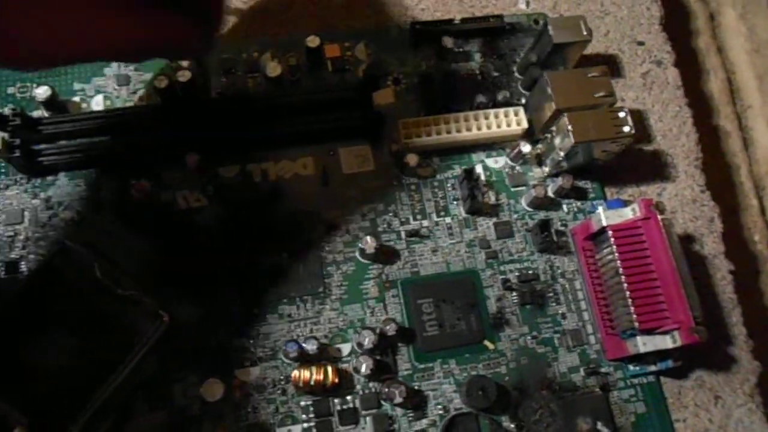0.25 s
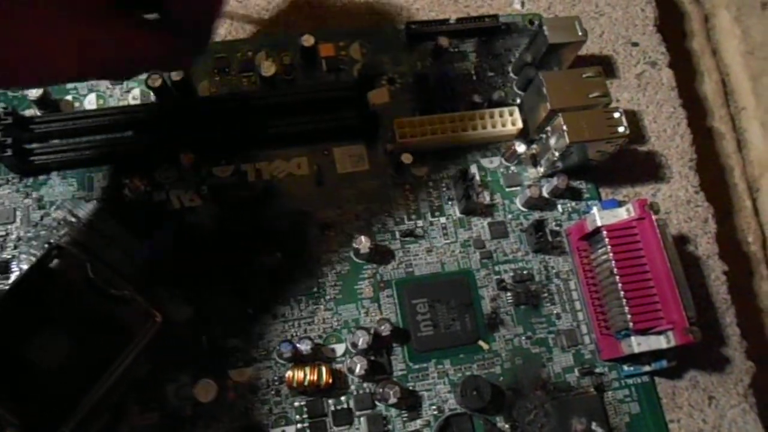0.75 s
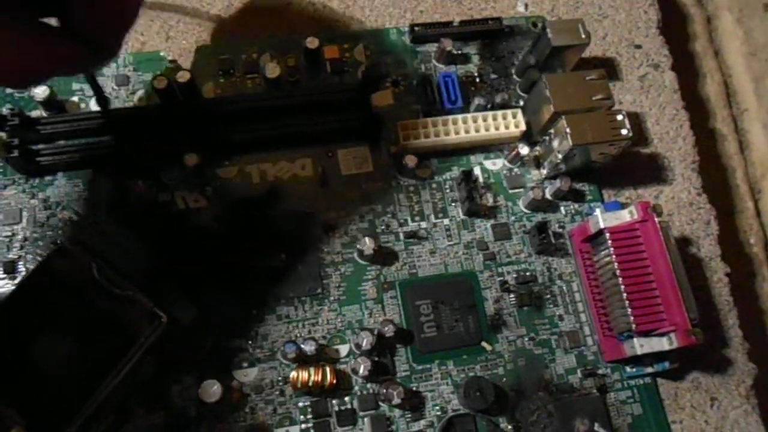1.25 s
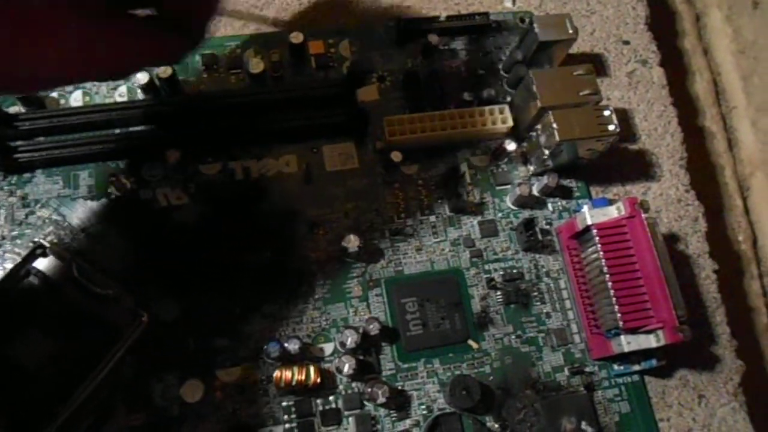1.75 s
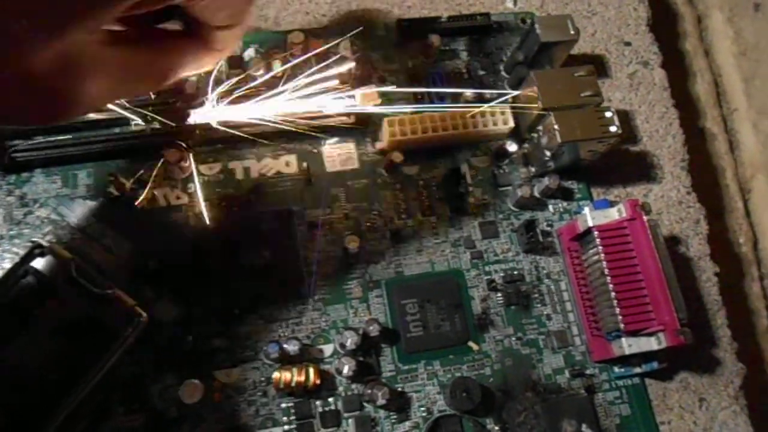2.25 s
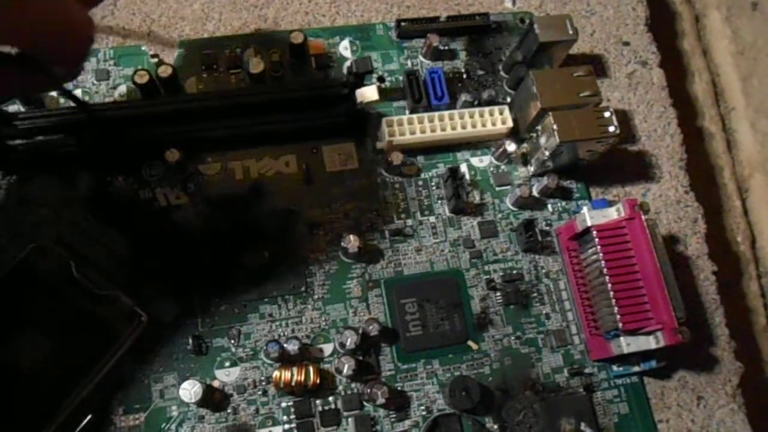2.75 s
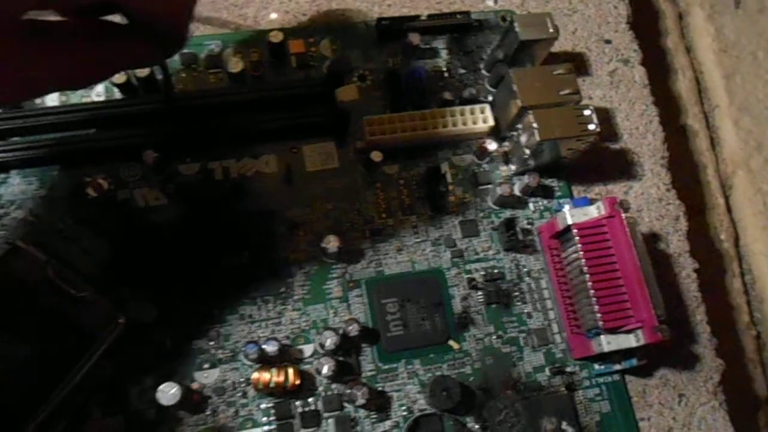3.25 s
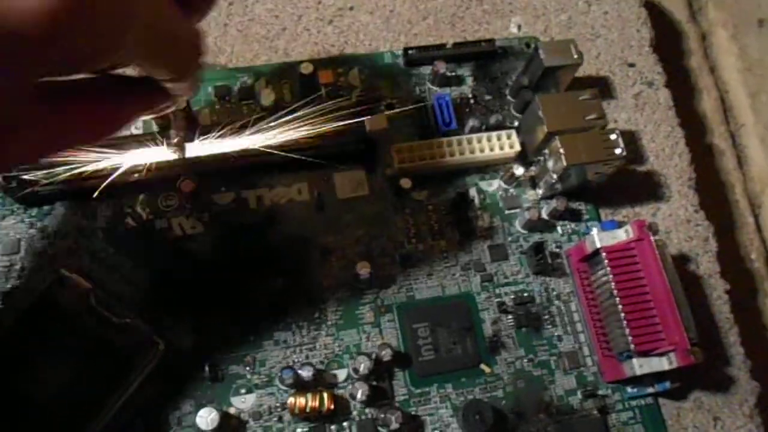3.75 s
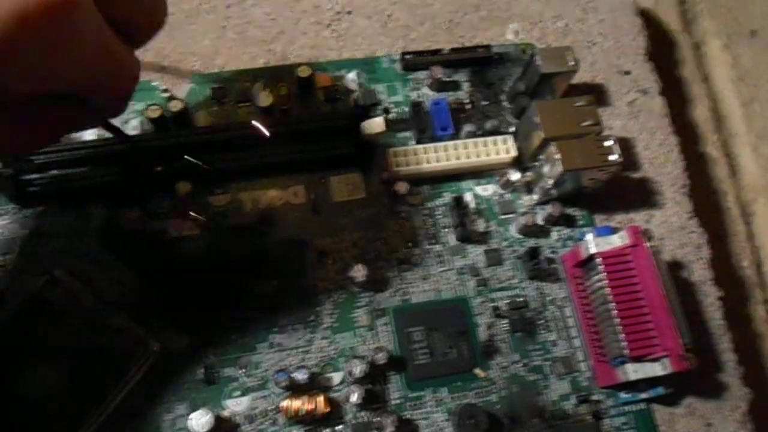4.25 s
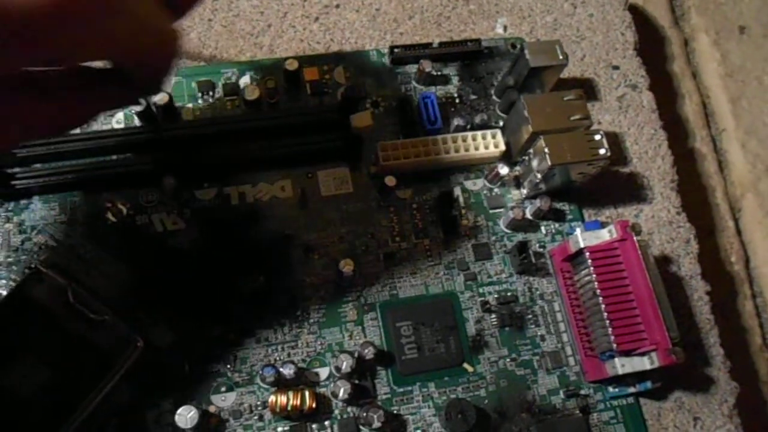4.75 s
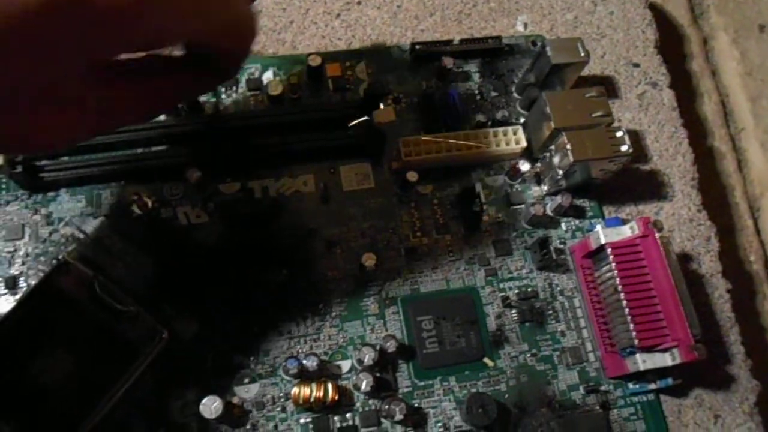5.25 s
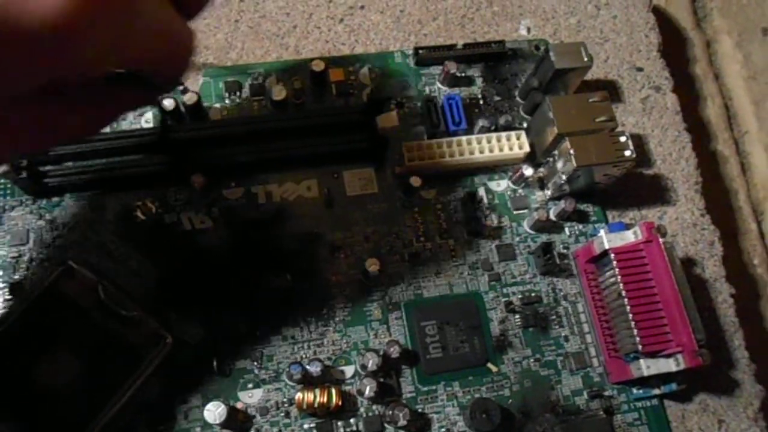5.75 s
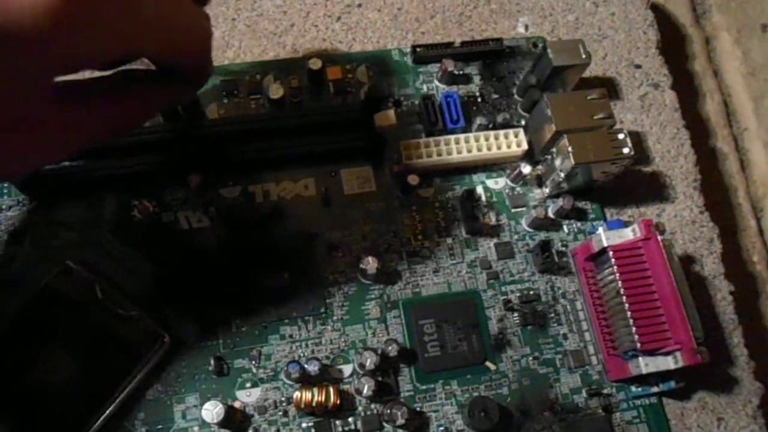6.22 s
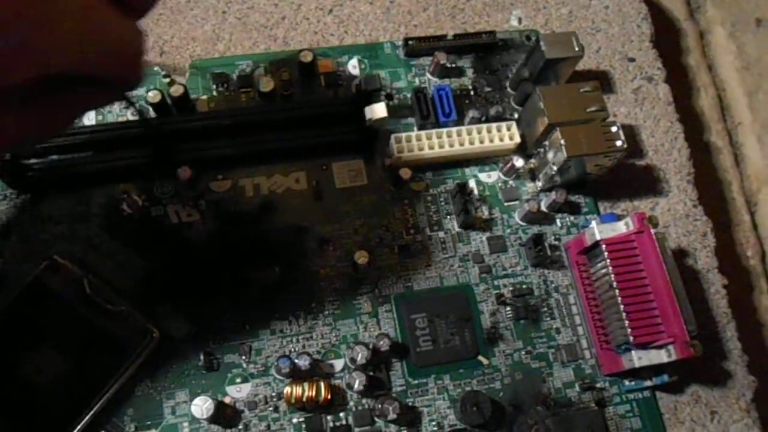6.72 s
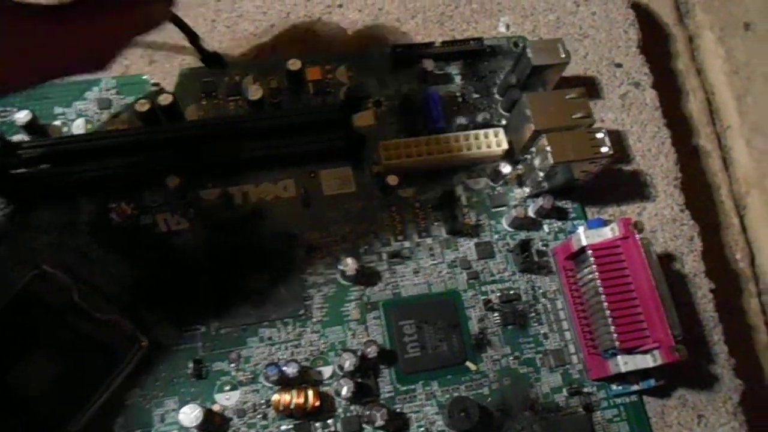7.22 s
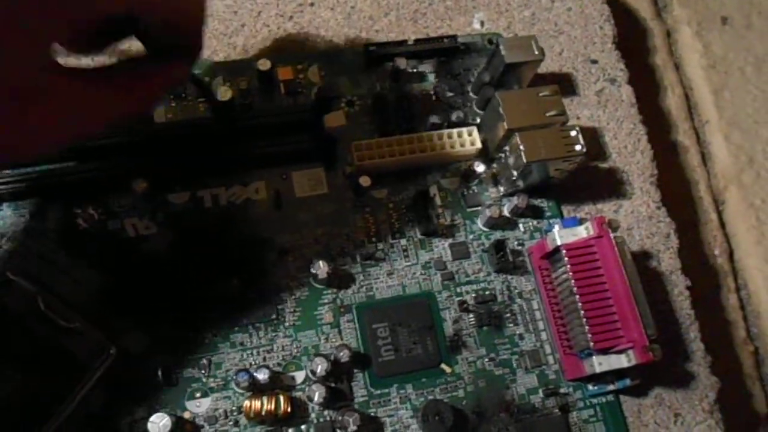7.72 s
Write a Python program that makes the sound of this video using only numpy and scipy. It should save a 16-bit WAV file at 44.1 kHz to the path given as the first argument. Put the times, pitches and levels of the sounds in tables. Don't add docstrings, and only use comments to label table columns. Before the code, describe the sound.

Irregular electric snaps, some single and some in rapid sputtering groups, jump out close and loud in a small, fairly dry room. Between them a metal tip scratches over pins, catches and taps the board, which rings briefly. Low supply hum fades over time beneath soft rumble and hiss. The strongest burst comes around the middle, with a distorted thump, and the ending is mostly scraping and knocking with a few last snaps.

```python
import sys
import numpy as np
from scipy import signal
from scipy.io import wavfile
from scipy.ndimage import uniform_filter1d, minimum_filter1d

SR = 44100
rng = np.random.default_rng(int(sys.argv[2]) if len(sys.argv) > 2 else 0)


def materialize(psi):
    bounded = np.clip(np.atleast_2d(psi).T, -1, 1)
    quanta = np.round(bounded * 32767).astype(np.int16)
    wavfile.write(sys.argv[1], SR, quanta)


def volts_from_db(level):
    exponent = np.asarray(level, float) / 20
    return 10 ** exponent


N = 351908

# time_s,
# level_db
ROOM_LEVEL = [
    (0, -43),
    (1.5, -43),
    (4.2, -42),
    (4.7, -49.5),
    (5.1, -38.5),
    (5.8, -47.5),
    (6.7, -46),
    (7.3, -39),
    (7.98, -50.5),
]
# freq_hz, density_db (per Hz)
ROOM_COLOUR = [(12, -51), (20, 10.5), (75, -5.5), (133, 0.5), (326, -13.5), (592, -10.5), (2770, -25.5),
               (10200, -30), (12500, -48.5)]
# time_s, level_db
HUM_LEVEL = [(0, -45), (.3, -38.5), (.7, -39.5), (2.6, -41), (4.1, -45.5), (4.4, -61), (5.3, -46),
             (5.75, -57), (6.1, -52.5), (6.8, -49), (7.1, -54), (7.98, -57)]
# freq_hz, t60_s
ECHO_DECAY = [(1000, 0.36), (3000, 0.29), (7000, 0.3), (11000, 0.28)]
# start_s, pitch_hz, level_db, t60_s
PING_TONES = [(5.28, 2320, -19.5, 0.044), (6.349, 7660, -10, 0.033), (6.363, 7750, -22, .03),
              (6.372, 7600, -11, .04), (6.378, 7800, -6, 0.021), (6.382, 7700, -15, 0.021),
              (6.378, 7800, -52, 0.22), (6.975, 2380, -53.5, 2), (6.975, 4264, -56.5, 1.4),
              (7.515, 1188, -15.5, 0.045), (7.703, 1190, -22.5, 0.057)]

# time_s, edge_mode_share (0-1), high_board_db, pin_against_arc_db
LEAD_PLACE = [(0, 0.05, -1.4, -6.5), (.35, 0, -0.5, -2), (.8, 0.07, -0.5, 3), (1.5, 0, -0.5, -10.5),
              (2.25, 0.03, -1, -5), (2.36, 0, 5.5, -5), (2.65, 0.04, -2.5, -1.5), (3.4, 0, -4.3, 1.5),
              (3.8, 0.05, -3.5, -0.5), (4.45, 0, -1, -1), (4.95, 0, -3.5, 0), (5.2, 0.35, 5.5, 0),
              (5.5, 0, -5, -1), (6.4, 0, 1, -4.5), (6.75, 0.57, -8, 3.5), (7.0, .99, 5.3, 2.5),
              (7.5, 0, 0.1, -18), (7.98, .9, 2, -6)]
# freq_hz, level_db
ARC_COLOUR = [(100, -8), (580, -10.5), (1170, -7.5), (1550, -7.5), (2860, -19.5), (4470, -4), (6560, 5),
              (7770, 4.5), (9820, -2.5), (10600, -2), (16000, -19)]
# pitch_hz, width_hz, level_db
BOARD_LOW_MODES = [(1055, 95, 0), (925, 90, -8), (1720, 130, -5)]
# pitch_hz, width_hz, level_db
BOARD_EDGE_MODES = [(1150, 85, 0), (1680, 70, 2), (920, 100, -8)]
# pitch_hz, width_hz, level_db
BOARD_HIGH_MODES = [(2545, 350, -1), (2960, 150, -5), (3250, 430, -2), (3600, 1100, 3)]
# pitch_hz, width_hz, level_db
PINS_STRUCK = [(5930, 1140, -1.5), (7120, 440, -11.5), (8170, 2200, -5), (8870, 180, -7.5), (9706, 990, 10)]
# pitch_hz, width_hz, level_db
PINS_SCRAPED = [(9700, 1400, -3), (6800, 260, -3.5), (7800, 220, 0), (8800, 250, 0), (9300, 260, 0.5)]

# start_s, length_s, mid_stroke_db, growth_db (over the stroke), board_ring_db (relative)
DRAG_STROKES = [(0.319, 0.24, -45.5, -20, 3), (0.729, 0.16, -39.5, -9, -2), (0.986, 0.253, -32.5, 8.5, -10),
                (1.355, 0.26, -38, 23, -6.5), (1.74, 0.3, -38, -7.5, -6.5), (2.082, 0.17, -39, 19, -5.5),
                (2.482, 0.28, -35, -0.5, -9), (2.72, 1, -60.5, -15, -0.5), (3.96, 0.22, -37, 25, -9),
                (4.758, 0.2, -39.5, -8, -2.5), (5.086, 0.21, -39, 19, -0.5), (5.411, 0.19, -35, 24, -7),
                (6.325, 0.062, -37, .1, -1), (6.686, 0.18, -38.5, -3, 1.5), (6.827, 0.21, -60.5, 0, 15),
                (7.583, 0.084, -46.5, 3, 4), (7.677, 0.088, -48, 0, -2), (7.756, 0.041, -43, 1, -3),
                (2.88, 0.049, -48, 3, -7), (4.554, 0.1, -47, -13, -7)]
# start_s, sizzle_db, burn_ms, board_ring_db (relative)
SOFT_SLIPS = [(.057, -29, 5, -3), (0.3343, -21, 3.4, -27), (0.369, -35, 4.6, 13), (0.394, -28.5, 10, 5.5),
              (.434, -23, 4.5, 5), (.762, -27.5, 8.7, 1), (0.829, -24, 8, -13), (1.027, -31, 20, -21),
              (1.056, -35, 9.4, 7), (1.086, -28, 6, -15), (1.098, -36, 5.2, -1), (1.127, -32, 9.7, 8),
              (1.450, -32, 8.6, -5), (1.504, -28, 20, 2), (1.521, -20, 7.8, -1.5), (1.605, -36, 4.5, -13.5),
              (1.779, -34, 9.7, -1), (1.867, -20.5, 7.9, -2.5), (1.890, -22, 5.7, 2),
              (1.925, -21, 17, -7.5), (2.163, -39, 5.1, 8), (2.312, -32, 5, 3.5), (2.563, -27.5, 8.4, -3),
              (2.612, -36, 4.1, 13.5), (2.626, -18, 3.5, -8), (2.643, -16.5, 5.2, 2.5),
              (3.347, -22.5, 3.8, -16), (4.033, -34, 8, 3.5), (4.804, -30.5, 5.8, -2.5),
              (4.851, -22, 4, -16), (4.875, -24, 5.4, -6), (5.147, -32, 4.9, -8), (5.210, -30, 5.9, 6),
              (5.497, -28.5, 11.5, 1), (5.510, -27, 7.6, 2), (5.525, -20, 14, -12), (5.554, -23, 4.4, -2),
              (5.592, -32, 6, 10), (6.695, -32.5, 9.1, -3), (6.71, -37, 9, 12.5), (6.730, -31, 7.7, 3),
              (6.749, -23, 5.8, 3), (6.761, -21.5, 6, -10), (6.797, -35, 8.6, 6), (6.808, -22.5, 7, 6),
              (6.835, -32, 4.1, 0), (7.495, -31.5, 4.8, 9), (7.690, -39, 17, -10), (7.721, -36, 6, -14.5),
              (7.778, -37, 18, 5)]
# start_s, sizzle_db, board_ring_db (relative)
PIN_TICKS = [(0.5236, -39.5, -2), (1.019, -32, -21), (1.139, -35, -8), (1.214, -29, 4), (1.3717, -37, 2),
             (1.615, -27.5, 6), (1.7503, -26, 0), (1.795, -30.5, 4), (2.181, -29, -12), (2.348, -37, 10),
             (2.47, -48, 10), (2.492, -51.5, 4), (3.042, -44, -4), (4.385, -44, -13), (6.318, -47, -10),
             (6.403, -41.5, 10), (3.0677, -37.5, -9), (3.139, -25, 6), (3.181, -33, 6), (3.282, -34, -2.5),
             (3.312, -31, -13.5), (3.6774, -31.5, 3), (3.7258, -31, -1.5), (4.3624, -42.5, -3.5),
             (4.4067, -36, -17.5), (4.45, -37, -8.5), (4.5503, -42, 10), (5.2765, -51, -1),
             (5.608, -27.5, 6), (5.8442, -45.5, 5.5), (5.895, -42.5, 6), (5.912, -29, 0), (7.68, -31, -3)]
# start_s, sizzle_db, board_ring_db (relative)
BOARD_KNOCKS = [(.0066, -33, 6), (0.334, -28.5, 11.5), (0.368, -41, 9), (0.8753, -32, 12.5),
                (0.9497, -62.5, 33.5), (1.6993, -48.5, 22), (1.8957, -19, 0.5), (2.229, -27, 4.5),
                (2.234, -32, 10.5), (2.291, -32, 6), (6.3714, -27, 8), (2.3774, -45, 18.5),
                (3.233, -43, 18.5), (3.29, -51.5, 27.5), (3.3247, -59.5, 37), (3.923, -56.5, 25.5),
                (4.533, -28, 2.5), (4.7957, -43, 22.5), (5.165, -46, 21.5), (5.542, -25, 3),
                (6.3358, -33.5, 6.5), (6.4097, -33, 2), (6.7802, -25.5, 4.5), (6.817, -18, 5),
                (6.9714, -35.5, 9), (7.0073, -50.5, 16.5), (7.4697, -25.5, 9.5), (7.51, -24, -11),
                (7.532, -55.5, 28), (7.609, -33, 7), (3.668, -43.5, 0), (7.7046, -30, -25.5)]
# start_s, sizzle_db, burn_ms, board_ring_db (relative)
BRUSH_SPITS = [(.0926, -24.5, 11.7, 6), (.3893, -26, 4.4, -3), (.44, -23, 6.8, 0.5), (.508, -32, 1.7, -25),
               (1.164, -21, 11, -1), (1.1868, -15, 4.6, -0.5), (1.5115, -40, 3.5, -2),
               (1.5298, -9, 2.5, -13), (1.5352, -10.5, 5.2, -10), (1.8477, -24, 4, -8),
               (1.872, -28, 4.6, -8.5), (1.8775, -19, 2.8, -8.5), (2.2966, -22, 7.7, -2.5),
               (2.631, -26, 18, 1.5), (2.9155, -19.5, 9.1, 1.5), (2.95, -11, 2.2, -28),
               (2.987, -27, 4.6, -7.5), (3.3457, -28, 17, 6.5), (3.446, -15.5, 5.7, -28.5),
               (3.4756, -21.5, 1.3, 7), (3.5245, -23.5, 9.1, -7), (3.6877, -24.5, 5.3, -0.5),
               (3.7707, -21.5, 9.2, 5), (4.16, -18, 8.4, -14), (4.8227, -15.5, 2.3, -0.5),
               (5.2554, -19, 3.8, -25), (6.349, -22, 3.7, -10), (6.363, -23, 3.3, -3),
               (6.3765, -23, 2.7, 8.5), (6.9313, -21.5, 8.4, 2), (7.7992, -20, 7.1, -17)]
# start_s, sizzle_db, burn_ms, board_ring_db
ARC_FLASHES = [(0.0148, -7.5, 2.7, -8), (0.0747, -10, 8.3, -16), (0.4189, -7, 7.3, -23),
               (0.4944, -3.5, 2.7, -30), (0.7883, -9, 3.2, -3.5), (0.7955, -6, 3.8, -16),
               (0.802, -14, 2.6, 7), (0.8126, -13, 2.9, -14), (0.817, -3, 6.5, -10),
               (1.1536, -4.5, 1.8, -27), (1.1587, -8.5, 1.7, -6.5), (1.173, -16, 2.5, 2.5),
               (1.54, -6, 5, -6), (1.907, -9, 5.2, -8), (1.9201, -12.5, 4.9, -6), (2.6515, -13, 4.9, -6.5),
               (2.687, -21.5, 7.2, -7.5), (2.6652, -8, 13.5, -18.5), (2.6799, -4, 4.6, -14.5),
               (3.1075, -4.5, 21.5, -14.5), (3.423, -6, 10.5, -21), (3.4326, -5, 5.6, -23.5),
               (3.4618, -5.5, 3.4, -43), (3.7824, -4.5, 18.9, -11), (4.1686, -11.5, 4.2, 1),
               (4.177, -6, 13.2, -16), (4.195, 1.5, 11.4, -34), (4.4727, -8, 8.1, -29),
               (4.5391, -13.5, 3.4, -34), (4.8341, 6.5, 4.5, -17), (4.8863, -4.5, 1.8, -8.5),
               (5.2268, -14, 9.4, -13.5), (5.2406, 2.5, 4.5, -30.5),
               (0.0694, -11.5, 3.2, -31.5), (0.0843, -12, 14, -35), (0.773, -19, 2.5, -2),
              (1.182, -10, 2.9, -19), (1.1962, -13, 1.8, -13), (1.556, -9.5, 3.8, -13),
              (1.562, -13.5, 8.2, -2), (5.5482, -20, 2.1, 4), (7.478, -22, 1.6, 2), (2.253, -13, 2.4, -11),
              (2.2597, -10, 6.5, -1.5), (2.2745, -10, 6.9, -9.5), (2.934, 0, 0.63, -28),
              (2.9256, -0.5, 0.45, -28), (5.625, -12.5, 3.8, -6.5), (6.9025, -9, 2.8, -1),
              (4.4354, -16, 2.5, -33), (4.487, -29, 7, -32), (3.4105, -7.5, 7.7, -28),
              (3.5016, -12.5, 2.9, -9.5), (4.1312, -13, 3.5, -5.5), (4.391, -10.5, 3.6, -34),
              (4.4341, -13, 1.6, -25), (4.855, 0, 2.5, -36), (4.869, -18.5, 4, -5), (5.562, -8, 2.2, -13),
              (5.5783, -15, 4.5, -5), (5.622, -21.5, 5.6, -3.5), (6.3512, -11.5, 4.2, -9.5),
              (6.881, -3, 2.1, -4), (6.8967, -13, 4, 0.5), (6.914, -19, 13, 2), (7.6148, -5, 1.9, -2)]

# start_s, pinned_s, level_db, rebound_height, rebound_s
OVERLOAD_POP = (4.1705, .0072, -3.3, .3, .072)
# freq_hz, level_db
MIC_RESPONSE = [(10500, 0), (10900, -8), (12300, -10), (12700, -75)]
# freq_hz, level_db
CONVERTER_RESPONSE = [(16000, 0), (16800, -70)]

HUM_HZ = 147.8
GRIP_DB = 3
HIGH_RING_DB, HIGH_FOLLOWS = -1.5, 0.54
ARCH_DB, LAND_S, LIFT_S = -14.5, 0.02, 0.009
REST_DB = -71
KNOCK_MS, TICK_MS = 8.6, 6.1
STRIKE_S, SLIP_S = 0.00036, 0.0029
SQUEEZE = 1.35
CLIP_DB = -3.0


def evened(x):
    return x / np.sqrt(np.mean(x ** 2) + 1e-20)


def read(points, hz):
    f, value = np.transpose(points)
    return np.interp(np.log(hz + 1), np.log(f + 1), value)


def curve(rows, column=1):
    rows = np.array(rows)
    return np.interp(np.arange(N) / SR, rows[:, 0], rows[:, column])


def colour(points):
    hz = abs(np.fft.fftfreq(4096, 1 / SR))
    log_gain = np.log(volts_from_db(np.maximum(read(points, hz), -100)))
    return np.fft.ifft(np.exp(np.conj(signal.hilbert(log_gain)))).real[:1024]


def crackle(per_s, spread_db):
    size = volts_from_db(spread_db * np.minimum(rng.exponential(1, N), 4)) * rng.standard_normal(N)
    return evened(size * (rng.random(N) < per_s / SR))


def flutter(ms, depth_db):
    width = max(round(ms * SR / 1000), 2)
    return volts_from_db(depth_db * evened(uniform_filter1d(rng.standard_normal(N), width)))


def room_noise():
    frames, hz = N // 256 + 5, np.fft.rfftfreq(1024, 1 / SR)
    real, imag, patches = rng.standard_normal((frames, 513, 3)).T
    patches = evened(uniform_filter1d(uniform_filter1d(patches, 8, 0), 14, 1))
    z = (real + 1j * imag) * volts_from_db(read(ROOM_COLOUR, hz)[:, None] + 0.53 * patches)
    noise = signal.istft(z, nperseg=1024, noverlap=768)[1][:N]
    return volts_from_db(curve(ROOM_LEVEL) + 11) * evened(noise)


def hum():
    turns = np.cumsum(HUM_HZ * flutter(ms=150, depth_db=0.02)) / SR
    return volts_from_db(curve(HUM_LEVEL)) * flutter(ms=120, depth_db=1.6) * np.sin(2 * np.pi * turns)


def echoes(x):
    taps = np.zeros(SR // 2)
    at = np.arange(120, SR // 2 - 12, 12)
    taps[at + rng.integers(0, 12, len(at))] = rng.choice([-1., 1.], len(at))
    hz, t, z = signal.stft(taps, SR, nperseg=128)
    decay = volts_from_db(-60 * t / read(ECHO_DECAY, hz)[:, None])
    tail = signal.istft(z * decay, SR, nperseg=128)[1]
    return signal.fftconvolve(x, tail / np.linalg.norm(tail))[:N]


def ducking(lead, threshold_db, most_db, recover_db):
    power_db = 10 * np.log10(abs(uniform_filter1d(lead ** 2, size=1800)) + 1e-12)
    climb = np.arange(N) * recover_db / SR
    held_db = np.maximum.accumulate(power_db + climb) - climb
    over_db = np.clip(held_db - threshold_db, 0, most_db)
    return volts_from_db(-SQUEEZE * uniform_filter1d(over_db, size=1500))


def pings():
    t, rattle = np.arange(N) / SR, flutter(ms=1.5, depth_db=3.0)
    out = np.zeros(N)
    for s, hz, db, t60 in PING_TONES:
        attack = np.clip((t - s) / 0.00053, 0, 1)
        decay = volts_from_db(db - 60 * np.maximum(t - s, 0) / t60)
        out += attack * decay * np.sin(2 * np.pi * hz * t) * rattle ** (t60 < 0.1)
    return out


def ring(modes):
    t = np.arange(3000) / SR
    taps = np.zeros(len(t))
    for hz, width, db in modes:
        taps += volts_from_db(db) * np.sqrt(width) * np.exp(-np.pi * width * t) * np.sin(2 * np.pi * hz * t)
    taps = taps * (1 - np.exp(-t * modes[0][1] / 0.05))
    return taps / np.linalg.norm(taps)


def rung(drive, modes, detune):
    grip = np.repeat(rng.integers(0, 4, N // 1300 + 1), 1300)[:N]
    shift = 1 + detune * rng.uniform(-1, 1, (4, len(modes), 1)) * [1, 0, 0]
    turn = np.arange(4)[:, None, None] + np.arange(len(modes))[:, None]
    lean = GRIP_DB * np.cos(np.pi / 2 * turn) * [0, 0, 1]
    out = np.zeros(N)
    for k in range(4):
        out += signal.oaconvolve(drive * (grip == k), ring(modes * shift[k] + lean[k]))[:N]
    return out


def strike(sizzle, low, high, pin_share, pins):
    edge = np.clip(curve(LEAD_PLACE), 0, 1)
    share = np.clip(pin_share * volts_from_db(curve(LEAD_PLACE, column=3)), 0, 1)
    arc = signal.oaconvolve(np.sqrt(1 - share) * sizzle, colour(ARC_COLOUR))[:N]
    board = rung(np.sqrt(1 - edge) * low, BOARD_LOW_MODES, detune=0.035)
    board += rung(np.sqrt(edge) * low, BOARD_EDGE_MODES, detune=0.02)
    board += rung(high * volts_from_db(curve(LEAD_PLACE, column=2)), BOARD_HIGH_MODES, detune=0.085)
    return arc + board + rung(np.sqrt(share) * sizzle, pins, detune=0.01)


def scrape():
    drives = volts_from_db(REST_DB) * np.ones((3, N))
    for s, length, db, growth_db, ring_db in DRAG_STROKES:
        t = np.arange(round(length * SR)) / SR
        u = 2 * t / length - 1
        touch = np.clip(np.minimum(t / LAND_S, (length - t) / LIFT_S), 0, 1)
        level = volts_from_db(db + 0.5 * growth_db * u + ARCH_DB * u ** 2) * touch
        split = volts_from_db([[0], [ring_db + 5.5], [0.25 * ring_db + 0.5]])
        drives[:, round(s * SR):][:, :len(t)] += level * split
    noise = [crackle(per_s=12000, spread_db=2.5),
             crackle(per_s=2100, spread_db=-1.5) * flutter(ms=6.3, depth_db=0.5),
             crackle(per_s=5000, spread_db=0.5)]
    drives = drives * noise * flutter(ms=4.5, depth_db=1.56)
    return strike(*drives, pin_share=0.4, pins=PINS_SCRAPED)


def sparks():
    drives = np.zeros((3, N))
    knocks = [(s, db, KNOCK_MS, ring_db) for s, db, ring_db in BOARD_KNOCKS]
    ticks = [(s, db, TICK_MS, ring_db) for s, db, ring_db in PIN_TICKS]
    kinds = [(0.11, STRIKE_S, ARC_FLASHES),
             (1, STRIKE_S, BRUSH_SPITS + knocks + ticks),
             (0.48, SLIP_S, SOFT_SLIPS)]
    for sag, rise_s, rows in kinds:
        for s, db, ms, ring_db in rows:
            length = ms / 1000
            t = np.arange(round((length + 0.03) * SR)) / SR
            dying = np.maximum(t - length + 0.0015, 0) / min(0.0031, 1.7 * length)
            burn = (1 - np.exp(-t / rise_s)) * np.exp(-0.5 * t / length * sag - dying)
            part = drives[:, round(s * SR):][:, :len(t)]
            split = volts_from_db([[db], [db + ring_db - 5.0], [db + HIGH_RING_DB + HIGH_FOLLOWS * ring_db]])
            part += split * burn[:part.shape[1]]
    noise = [crackle(per_s=30000, spread_db=1.5) * flutter(ms=1.6, depth_db=2.5),
             crackle(per_s=8000, spread_db=-4.0),
             crackle(per_s=9600, spread_db=2.0)]
    return strike(*(drives * noise), pin_share=0.45, pins=PINS_STRUCK)


def scene():
    lead = sparks() + scrape() + pings()
    duck = ducking(lead, threshold_db=-28.5, most_db=13.0, recover_db=26.5)
    background = room_noise() * duck + volts_from_db(8) * hum() * duck ** 0.63
    return (lead + volts_from_db(-19.5) * echoes(lead) + background)[None]


def overload(x):
    s, length, db, height, back = OVERLOAD_POP
    t = np.arange(N) / SR - s
    pinned = np.clip(np.minimum(t / 0.0002, (length - t) / 0.0008 + 1), 0, 1)
    after = np.maximum(t - length, 0)
    rebound = height * (1 - np.exp(-after / 0.008)) * np.exp(-(after / back) ** 2)
    undershoot = 0.065 * (np.exp(-after / 0.3) - np.exp(-after / 0.1))
    return x * (1 - 0.6 * pinned) - 1.6 * volts_from_db(db) * pinned + rebound - undershoot


def limit(x):
    rail = volts_from_db(CLIP_DB)
    room_left = np.minimum(1.07 * rail / (abs(x) + 1e-9), 1)
    x = x * uniform_filter1d(minimum_filter1d(room_left, size=45), size=35)
    return x / (1 + abs(x / rail) ** 12) ** (1 / 12)


def roll_off(x):
    return signal.sosfilt(signal.butter(12, 16800, fs=SR, output="sos"), x)


def record(dry):
    x = signal.oaconvolve(dry, colour(MIC_RESPONSE)[None])[:, :N]
    x = limit(overload(x))
    x = signal.oaconvolve(x, colour(CONVERTER_RESPONSE)[None])[:, :N]
    return roll_off(x)


dry = scene()
out = record(dry)
materialize(out)
```